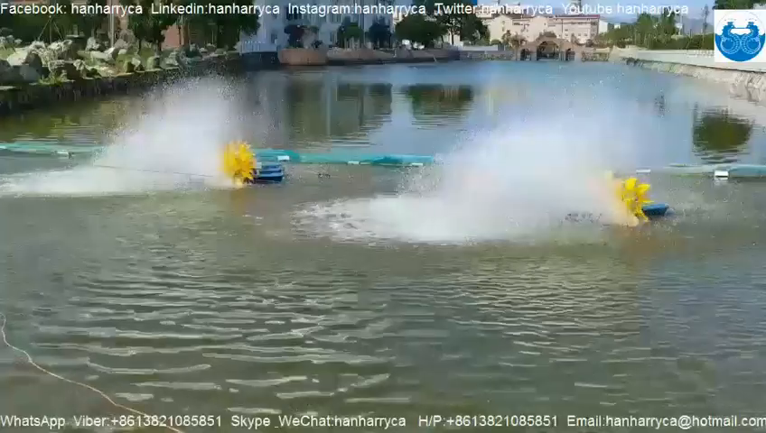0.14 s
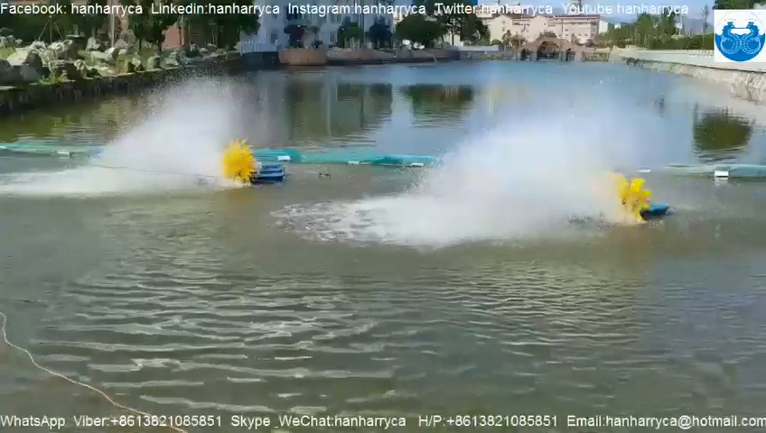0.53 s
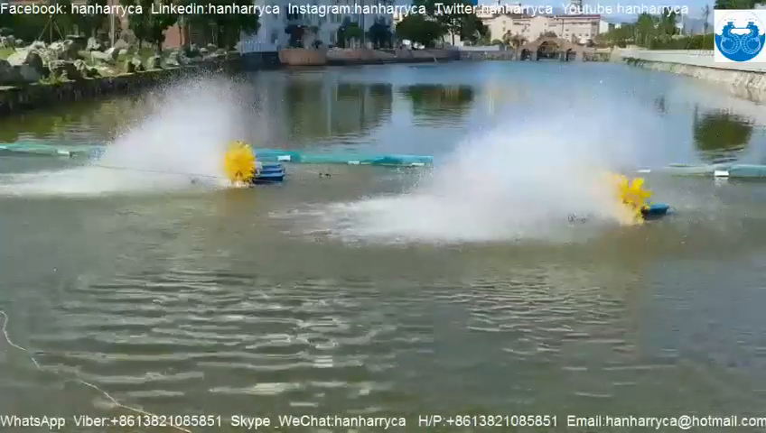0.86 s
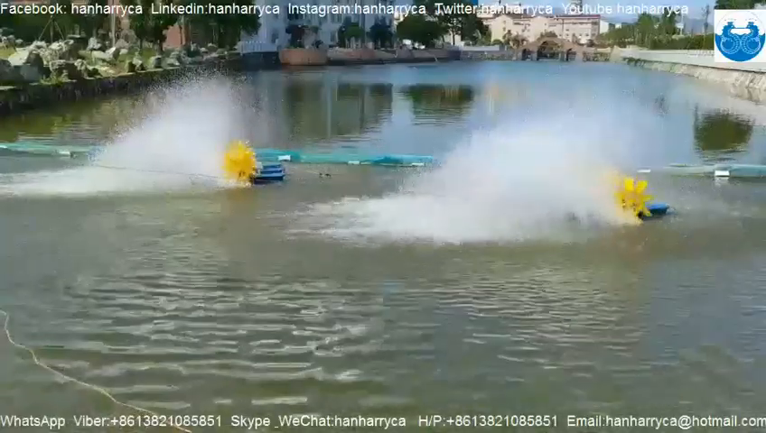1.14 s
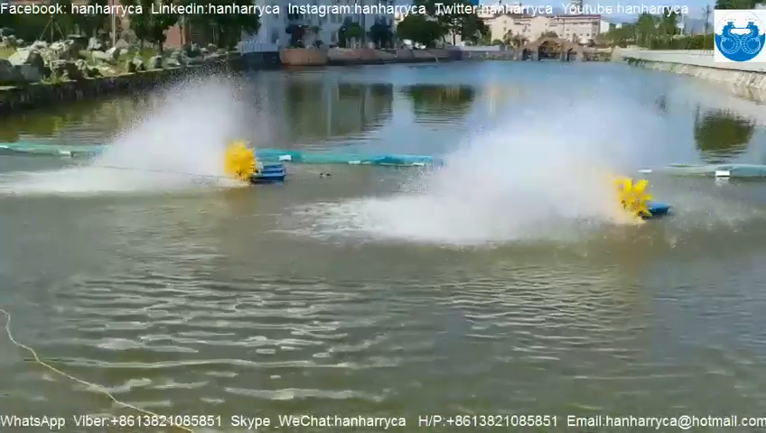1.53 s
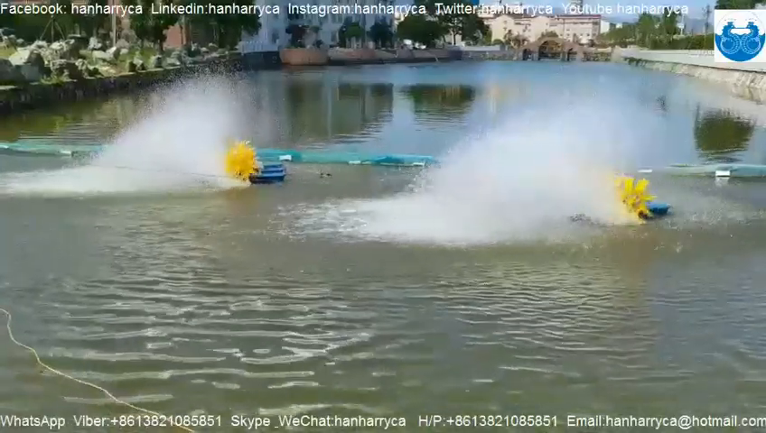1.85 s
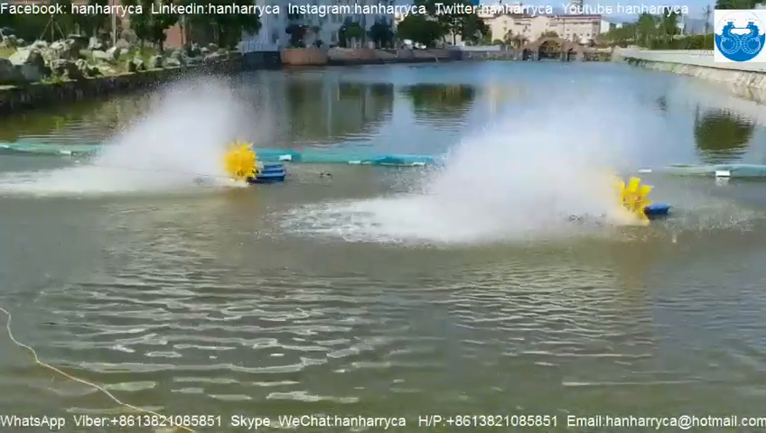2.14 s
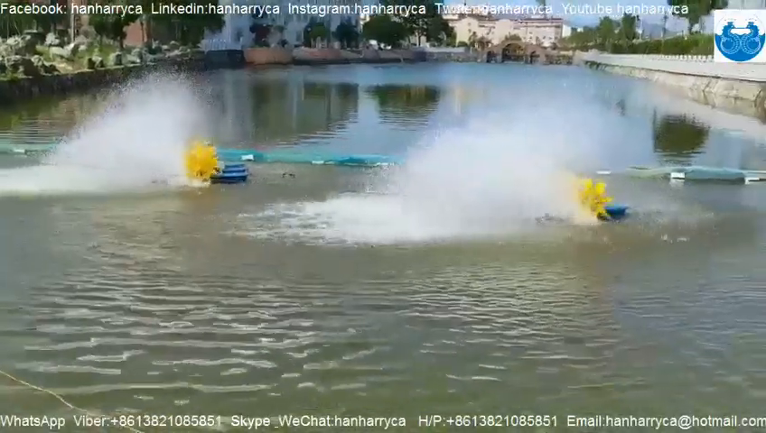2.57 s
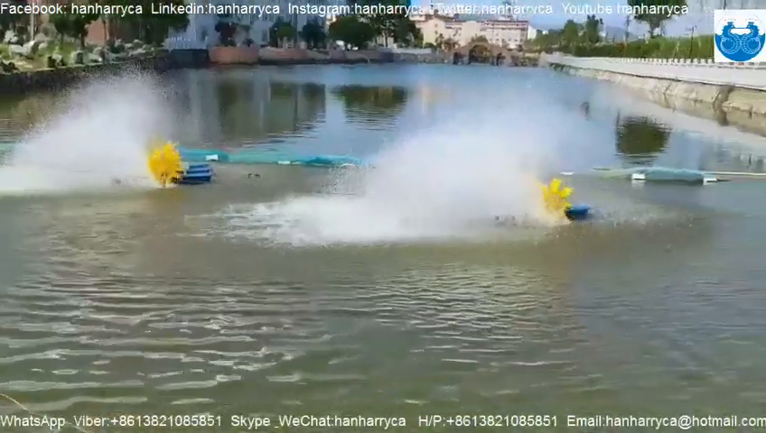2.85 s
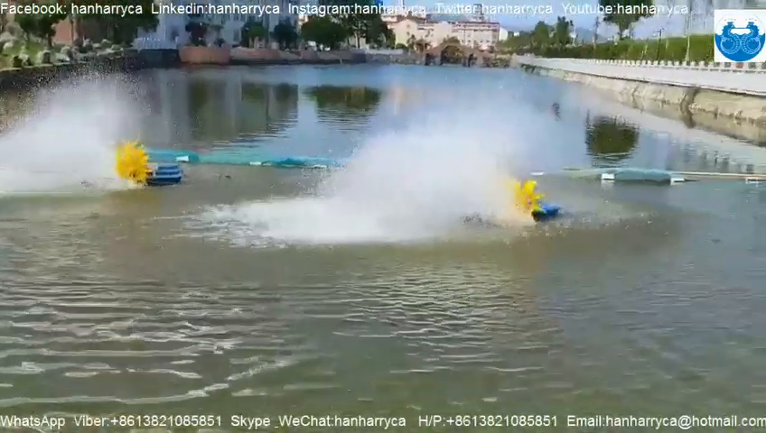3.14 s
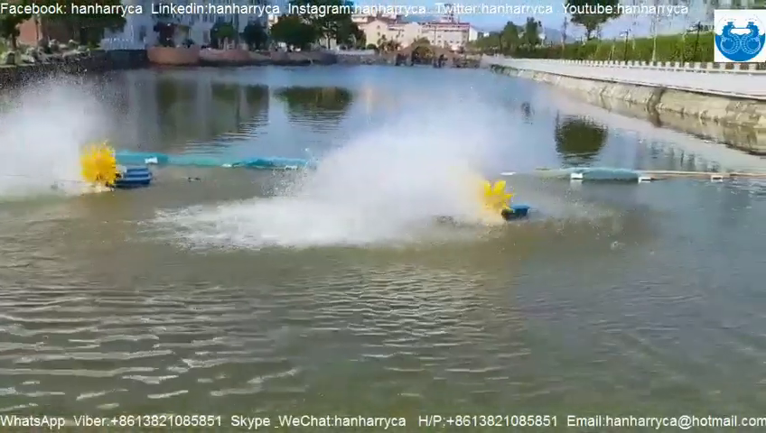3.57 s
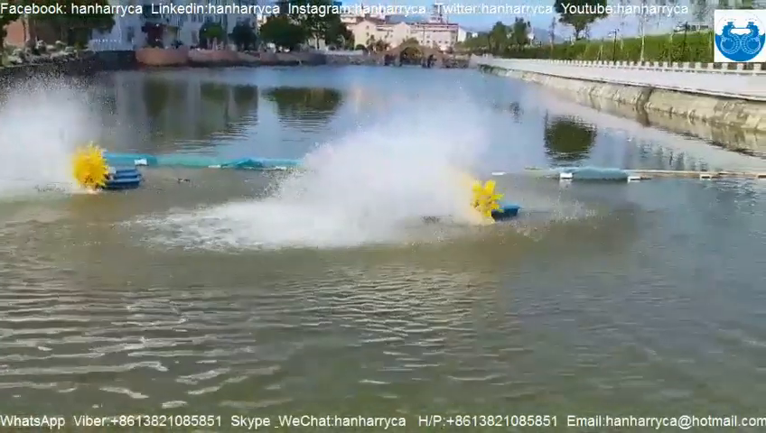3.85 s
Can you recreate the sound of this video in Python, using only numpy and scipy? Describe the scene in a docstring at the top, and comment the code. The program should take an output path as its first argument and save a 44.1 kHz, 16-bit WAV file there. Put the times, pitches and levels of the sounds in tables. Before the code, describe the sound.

Dense splashing water from two paddle wheels churning an open pond, heard in wide stereo from the bank. Silence until about 0.2 seconds, then a quick fade-in to full rush by 0.35. Bright, sizzling spray is strongest in the first second, then eases slightly, fluttering until 4 seconds. Hollow gurgles run beneath, with small plops mostly after 1.7, low churning, a soft plunge near 2.6 and faint motor hum.

```python
"""A pond, heard from the bank: two paddle wheel aerators churn the water.
Thrown water falls back as a dense, surging rush of spray, drops and sizzling mist: shaped noise and clicks.
Heavier splashes carry gurgles, gulps and a hollow ringing: short dying tones and one wavering tone.
The paddles dig in with low churning noise and a few plunges; the drives hum faintly underneath.
The sound fades in quickly out of silence."""
import sys
import numpy as np
from scipy import signal
from scipy.fft import rfft, irfft
from scipy.io import wavfile

SR = 44100
rng = np.random.default_rng(int(sys.argv[2]) if len(sys.argv) > 2 else 0)


def waveform_to_disk(signal):
    """Save audio, clipped to [-1, 1], as 16-bit WAV at the path in sys.argv[1]."""
    frames = np.transpose(np.atleast_2d(signal))
    scaled = np.clip(frames, -1, 1) * 32767
    samples = np.round(scaled).astype(np.int16)
    wavfile.write(sys.argv[1], SR, samples)


N = 176400  # samples, 4 s
LEFT_RIGHT = np.array([[1], [-1]])
SURGE_HZ = 29  # drift rate shared by splash and spray
CUTOFF_HZ = 15800


# spray strength, before trim: (time_s, level_db)
SPRAY_LEVEL = [(.33, -30), (.45, -30.5), (.62, -31), (.74, -30), (1.0, -32.5), (1.17, -33.5), (1.4, -34.5),
               (1.5, -34), (1.6, -34.5), (1.95, -33.5), (2.15, -35), (2.25, -33), (2.47, -35),
               (2.67, -31.5), (3.25, -34), (4.0, -33)]
# spray colour, relative: (freq_hz, density_db_per_hz)
SPRAY_SPECTRUM = [(750, -9), (1250, -4.5), (2600, -7.5), (4000, -2), (5400, -1.5), (6500, -6.5), (7400, -2),
                  (7900, -7), (8400, -16.5), (11000, -21)]
# spray and mist position: (time_s, left_minus_right_db)
SPRAY_PAN = [(.3, 2), (.9, 3), (2.6, 3.5), (3.2, 3), (3.8, 4)]
SPRAY_TRIM_DB, SPRAY_SURGE_DB = -1, 0.75
FIZZ_HZ, FIZZ_SPREAD_OCTAVES, FIZZ_PER_S, FIZZ_DB = 3500, .5, 380, -10.5


def spraying():
    """Drops raining on the pond, the small bubbles they leave, and the mist, panned together."""
    surge_db = SPRAY_TRIM_DB + SPRAY_SURGE_DB * drift(SURGE_HZ)
    spray = from_db(surge_db) * rush(SPRAY_SPECTRUM, patchy_db=2.0, patchy_hz=24.0)
    fizz = from_db(FIZZ_DB) * bubbles(FIZZ_HZ, FIZZ_SPREAD_OCTAVES, FIZZ_PER_S,
                                      cycles=260.0, rise=0.093, size_db=2.0, pan_db=17.0)
    pan = from_db(LEFT_RIGHT * in_time(SPRAY_PAN) / 2)
    return pan * (from_db(in_time(SPRAY_LEVEL)) * (spray + fizz) + misting())


# treble level, before trim: (time_s, level_db)
MIST_LEVEL = [(0.33, -35.5), (0.63, -37), (0.73, -35.5), (1.05, -38), (1.17, -40), (1.23, -37),
              (1.28, -39.5), (1.78, -41.5), (1.82, -37.5), (1.89, -44), (1.95, -39), (2.61, -41),
              (2.86, -38.5), (3.11, -39.5), (3.13, -35.5), (3.19, -40.5), (3.88, -38.5), (4.0, -42)]
# mist colour, relative: (freq_hz, density_db_per_hz)
MIST_SPECTRUM = [(6000, -29), (8400, -7), (9700, 0.5), (12600, .5), (13300, -3.5), (16000, -3.5)]
MIST_TRIM_DB = 4.5


def misting():
    """The finest mist sizzles as a treble rush with its own flickering level."""
    level_db = in_time(MIST_LEVEL) + MIST_TRIM_DB
    return from_db(level_db) * rush(MIST_SPECTRUM, patchy_db=2.0, patchy_hz=24.0)


# heavier splashes, before trim: (time_s, level_db)
SPLASH_LEVEL = [(0.33, -35.5), (0.62, -39), (0.77, -38), (1.24, -40.5), (2.4, -42), (2.79, -42),
                (2.95, -42), (3.6, -42), (4.0, -42.5)]
# splash colour, relative: (freq_hz, density_db_per_hz)
SPLASH_SPECTRUM = [(200, -11), (370, -8.5), (490, 1), (570, -0.5), (750, -8), (890, -0.5), (1000, -1.5),
                   (1150, -3.5), (1450, -1), (1700, -3), (2300, -2.5), (3000, -9), (5000, -19)]
# a few gulps and plops, short dying tones: (start_s, peak_db, pitch_hz)
GULPS = [(1.755, -39.5, 860), (2.048, -38.5, 940), (2.102, -39, 1965), (2.79, -36, 933), (2.99, -36, 2336),
         (3.311, -36, 3925), (3.41, -38, 1047), (3.658, -38, 4630)]
SPLASH_TRIM_DB, SPLASH_SURGE_DB = 1.5, 0.94
RING_DB = -10  # against SPLASH_LEVEL
GULP_RISE = 0.019  # fractional pitch rise over a gulp


def splashing():
    """Heavy water falling back, with a gurgle, a hollow ringing and a few gulps and plops."""
    surge_db = SPLASH_TRIM_DB + SPLASH_SURGE_DB * drift(SURGE_HZ)
    splash = from_db(surge_db) * rush(SPLASH_SPECTRUM, patchy_db=2.55, patchy_hz=15.0)
    water = splash + gurgling() + from_db(RING_DB) * ringing()
    return from_db(in_time(SPLASH_LEVEL)) * water + cavities(GULPS, GULP_RISE)


# gurgle of short dying tones: (pitch_hz, level_db against SPLASH_LEVEL)
GURGLES = [(930, -10.5), (1420, -10)]
GURGLE_SPREAD_OCTAVES, GURGLES_PER_S = 0.0885, 90


def gurgling():
    """A gurgle of short dying tones clustered around two pitches."""
    out = 0
    for pitch_hz, level_db in GURGLES:
        shower = bubbles(pitch_hz, GURGLE_SPREAD_OCTAVES, GURGLES_PER_S,
                         cycles=88.0, rise=0.031, size_db=1.5, pan_db=14.0)
        out = out + from_db(level_db) * shower
    return out


RING_HZ, RING_WIDTH_HZ, RING_WAVER_HZ = 943.5, 20, 42.13


def ringing():
    """Hollow ringing: a narrow tone, unsteady in level and pitch; rms 1."""
    phase = 2 * np.pi * np.cumsum(RING_HZ + RING_WAVER_HZ * drift(4.0)) / SR
    return rms_one(drift(RING_WIDTH_HZ) * np.cos(phase) + drift(RING_WIDTH_HZ) * np.sin(phase))


# low churning, before trim: (time_s, level_db)
CHURN_LEVEL = [(.3, -42), (1.0, -44.5), (1.25, -49.5), (1.9, -44.5), (2.4, -49), (2.7, -47.5), (4.0, -45)]
# churning colour, relative: (freq_hz, density_db_per_hz)
CHURN_SPECTRUM = [(30, -12), (50, 3), (68, 4), (105, -4.5), (142, 4), (168, -2), (198, 1), (245, 0),
                  (335, -13.5), (500, -10.5), (900, -30.5)]
# heavy plunges of a paddle: (start_s, peak_db, pitch_hz)
PLUNGES = [(.965, -41, 61.4), (1.0, -49, 164), (1.33, -42, 168), (1.78, -42, 196), (2.622, -36.5, 161)]
CHURN_TRIM_DB = 1.33
PLUNGE_RISE = 0.13  # fractional pitch rise over a plunge


def churning():
    """Low tumbling of the water that the paddles dig through, with a few heavy plunges."""
    level_db = in_time(CHURN_LEVEL) + CHURN_TRIM_DB
    tumble = from_db(level_db) * rush(CHURN_SPECTRUM, patchy_db=1.1, patchy_hz=16.0)
    return tumble + cavities(PLUNGES, PLUNGE_RISE)


# hum of motors and gears, mean values: (pitch_hz, level_db)
HUM = [(50, -62), (74, -56.5), (199, -59.5), (299, -60.5)]
HUM_WAVER_DB, HUM_WAVER_SHARE = 2.5, 0.00726  # spread of level, and of pitch as a fraction


def drives():
    """Faint hum lines that waver with the load on the wheels."""
    out = 0
    for pitch_hz, level_db in HUM:
        wavering_hz = pitch_hz * (1 + HUM_WAVER_SHARE * drift(3.0))
        tone = np.sqrt(2) * np.sin(2 * np.pi * np.cumsum(wavering_hz) / SR)
        out = out + tone * from_db(level_db + HUM_WAVER_DB * drift(1.0))
    return out


TONE_S, TONE_SHORTENS = 0.039, 0.31  # length at 1 kHz; exponent, higher tones die sooner


def cavities(rows, rise):
    """Short tones, as of air cavities: each swells up, rings and dies, rising a little in pitch."""
    out = 0
    for start_s, peak_db, pitch_hz in rows:
        length_s = TONE_S * (1000 / pitch_hz) ** TONE_SHORTENS
        age = np.clip((np.arange(N) / SR - start_s) / length_s, 0, 1)
        swell = np.sin(np.pi * np.sqrt(age)) ** 2
        cycles = pitch_hz * length_s * age * (1 + rise * age / 2) + rng.random()
        out = out + from_db(peak_db) * swell * np.sin(2 * np.pi * cycles)
    return out


def bubbles(centre_hz, spread_octaves, per_s, cycles, rise, size_db, pan_db):
    """Bubble-like tones born at random, each short, dying and rising in pitch; rms 1."""
    out = np.zeros((2, N + SR))
    draws = rng.standard_normal((3000, 3))
    starts = np.cumsum(rng.exponential(1, len(draws))) * SR / per_s
    for start, (pitch, size, pan) in zip(starts[starts < N].astype(int), draws):
        pitch_hz = min(centre_hz * 2 ** (spread_octaves * pitch), CUTOFF_HZ)
        age = np.arange(0, 1, pitch_hz / (cycles * SR))
        level_db = size_db * min(size, 1.5) - 60 * age  # dies by 60 dB
        tone = np.sin(2 * np.pi * cycles * age * (1 + rise * age / 2)) * from_db(level_db)
        out[:, start:start + len(age)] += tone * from_db(LEFT_RIGHT * pan_db * np.tanh(pan) / 2)
    return rms_one(out[:, :N])


# likeness of left and right: (freq_hz, likeness_0_to_1)
LIKENESS = [(50, .88), (220, .88), (350, .7), (570, .79), (770, .3), (960, .76), (1170, .4), (1650, .42),
            (2000, .15), (2400, .35), (4000, .13), (5400, .18), (15000, .05)]
# balance within a rush: (freq_hz, left_minus_right_db)
BALANCE = [(1000, -1), (3500, -3), (7000, -3.5), (11000, -5), (15000, -5)]
# phase by which left leads right: (freq_hz, lead_rad)
LEFT_LEAD = [(450, 0), (600, .1), (770, .6), (1000, .2), (1180, 1.8), (1420, .8), (1750, 2.9), (2200, 4.7),
             (2500, 6), (3300, 6.3), (4500, 9.5), (7000, 15), (16000, 35)]


def rush(spectrum, patchy_db, patchy_hz):
    """Stereo shower of a given colour, each third of an octave swelling and ebbing by itself; rms 1."""
    hz = np.arange(N // 2 + 1) * SR / N
    mid, side = rfft(impacts()) * from_db(at_hz(spectrum, hz))
    alike = np.clip(at_hz(LIKENESS, hz), 0, 1)
    pair = np.sqrt(1 + alike) * mid + LEFT_RIGHT * np.sqrt(1 - alike) * side
    pair = pair * from_db(LEFT_RIGHT * at_hz(BALANCE, hz) / 2)
    pair[1] *= np.exp(-1j * at_hz(LEFT_LEAD, hz))
    out = 0
    for centre_hz in 2 ** np.arange(4, 14.5, 1 / 3):
        # overlapping triangles on a log-frequency axis
        band = np.maximum(0, 1 - 3 * np.abs(np.log2((hz + 1e-9) / centre_hz)))
        out = out + irfft(pair * band, N) * from_db(patchy_db * drift(patchy_hz))
    return rms_one(out)


DROPS_PER_S, DROP_SPREAD_DB, DROP_POWER_SHARE = 5400, 2, 0.39


def impacts():
    """Two unrelated showers of drop impacts of uneven size over the blur of countless smaller ones."""
    size_db = DROP_SPREAD_DB * np.minimum(rng.exponential(1, (2, N)), 5)
    sizes = from_db(size_db) * rng.choice([-1, 1], (2, N))
    clicks = rms_one(sizes * (rng.random((2, N)) < DROPS_PER_S / SR))
    blur = rng.standard_normal((2, N))
    return np.sqrt(DROP_POWER_SHARE) * clicks + np.sqrt(1 - DROP_POWER_SHARE) * blur


def drift(rate_hz):
    """Slow random motion, rms 1: noise sampled at SR / 40 through a two-pole low-pass with its corner near
    rate_hz."""
    r = np.exp(-80 * np.pi * rate_hz / SR)
    noise = rng.standard_normal(N // 40 + 2002)
    slow = signal.lfilter([1], [1, -2 * r, r * r], noise)[2000:]  # drop the filter's run-in
    return np.interp(np.arange(N) / 40, np.arange(len(slow)), rms_one(slow))


def from_db(db):
    """Decibels to gain."""
    return 10 ** (np.asarray(db) / 20)


def rms_one(x):
    """Scale to rms 1."""
    return x / np.sqrt(np.mean(x ** 2) + 1e-20)


def in_time(rows):
    """A curve of (time_s, value) at every sample."""
    return np.interp(np.arange(N) / SR, *np.transpose(rows))


def at_hz(points, hz):
    """Read a table of (freq_hz, value) on a log-frequency axis."""
    freq_hz, value = np.transpose(points)
    return np.interp(np.log(hz + 1e-9), np.log(freq_hz), value)


def scene():
    """Both wheels at work on the pond."""
    return spraying() + splashing() + churning() + drives()


START_S, FADE_S, LOW_CUT_HZ = 0.23, 0.11, 41


def record(dry):
    """A quick fade-in; the microphone drops the deepest bass, and the top is cut steeply."""
    fade = np.clip((np.arange(N) / SR - START_S) / FADE_S, 0, 1)
    high_pass = signal.butter(4, LOW_CUT_HZ, "high", fs=SR, output="sos")
    low_pass = signal.ellip(14, .1, 80, CUTOFF_HZ, fs=SR, output="sos")
    faded = signal.sosfilt(high_pass, dry) * np.sin(fade * np.pi / 2) ** 2
    return signal.sosfilt(low_pass, faded)


dry = scene()
out = record(dry)
waveform_to_disk(out)
```